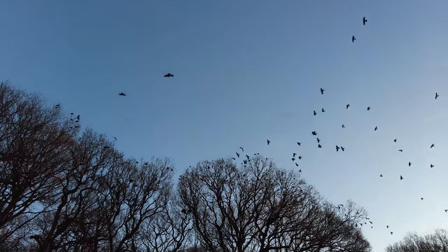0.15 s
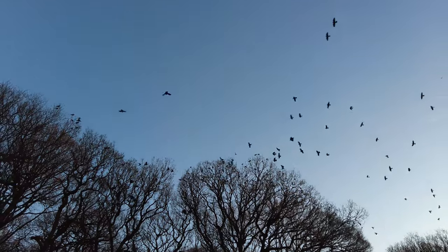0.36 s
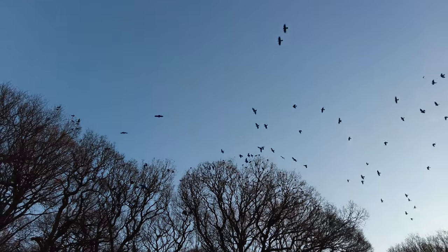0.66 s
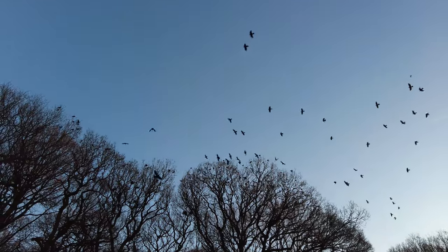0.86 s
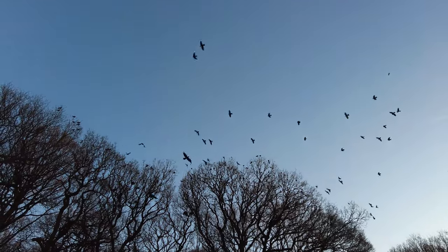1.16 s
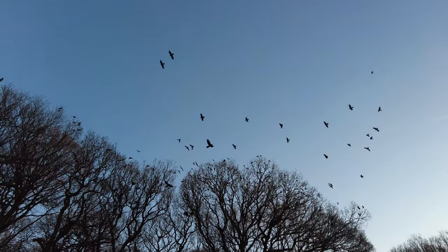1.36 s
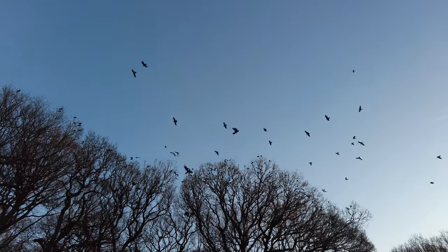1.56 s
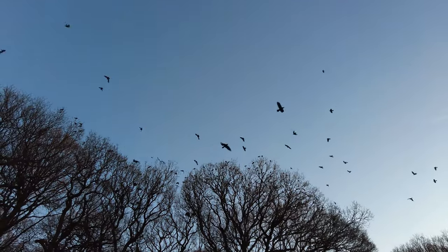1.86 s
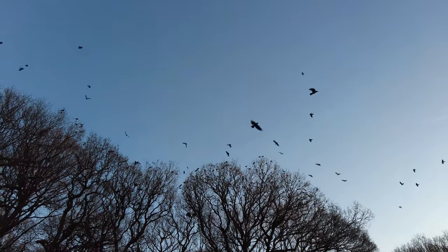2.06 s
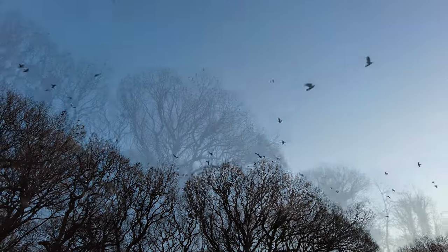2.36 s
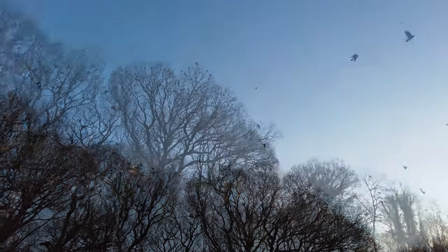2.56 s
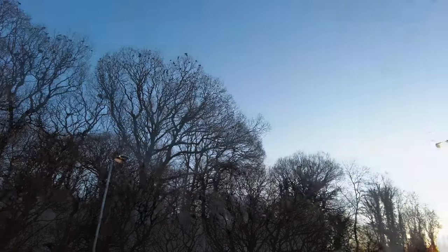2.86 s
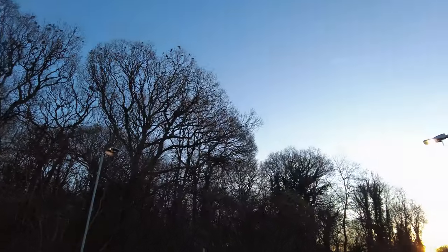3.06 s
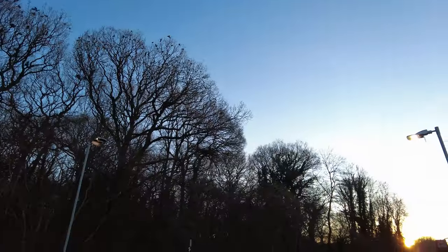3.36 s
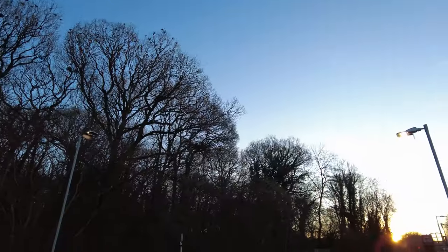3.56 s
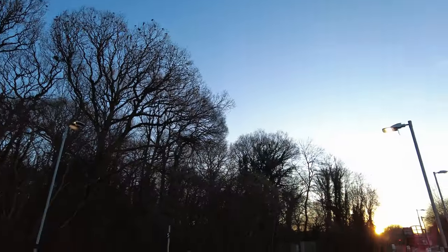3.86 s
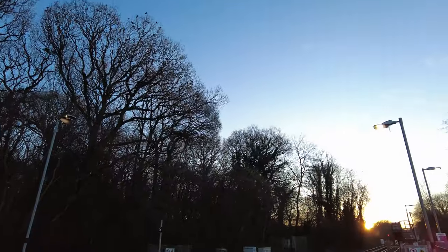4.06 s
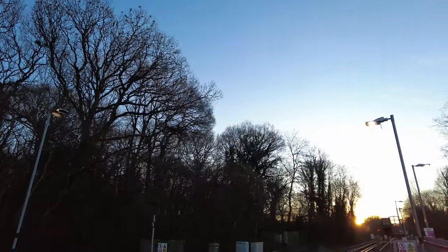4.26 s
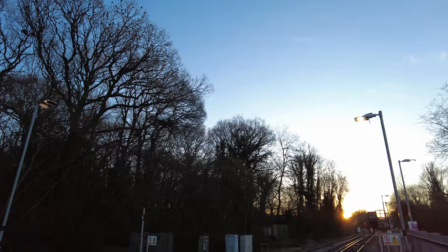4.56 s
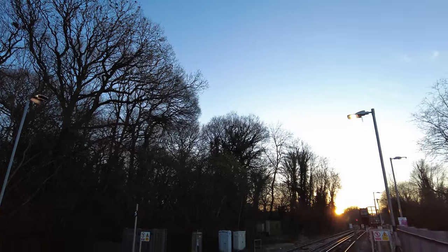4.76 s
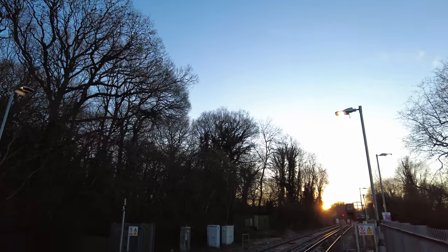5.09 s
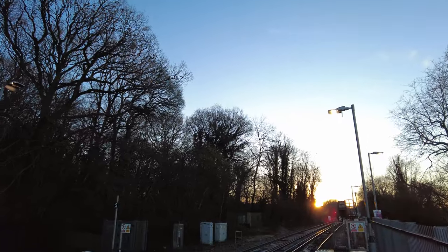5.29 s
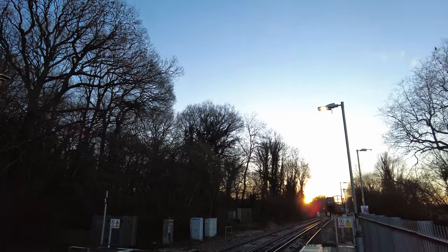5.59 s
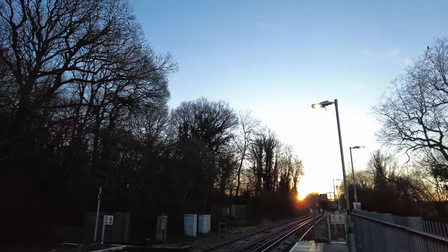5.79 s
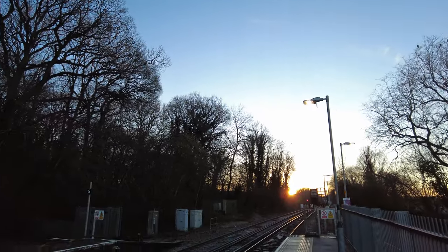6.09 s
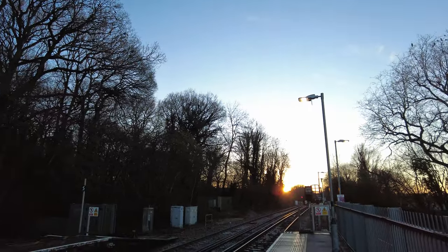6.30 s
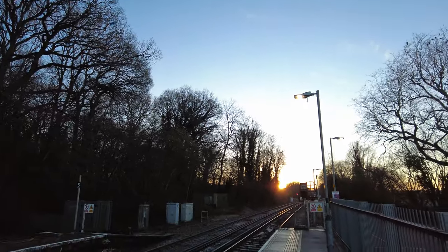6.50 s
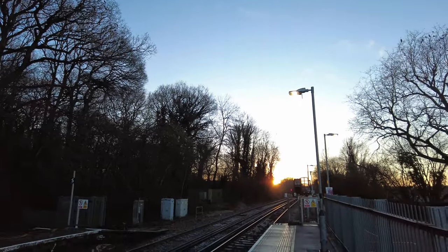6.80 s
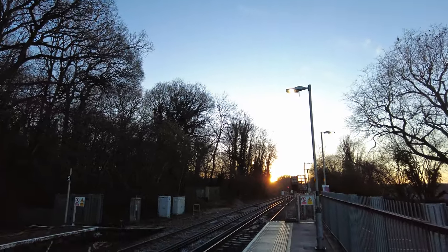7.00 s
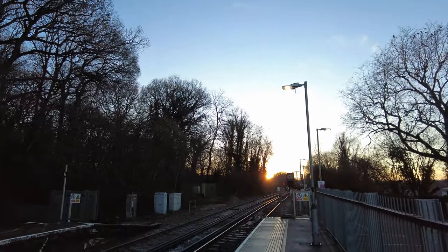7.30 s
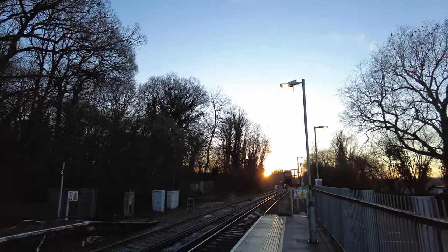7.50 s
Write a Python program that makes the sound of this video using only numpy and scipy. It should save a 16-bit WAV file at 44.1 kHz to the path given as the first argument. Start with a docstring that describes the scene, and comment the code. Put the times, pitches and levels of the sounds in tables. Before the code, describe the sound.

A jackdaw flock clamours over bare trees with short falling chacks, thins, then picks up again with two hoarse rook caws above low traffic rumble.

```python
"""Jackdaws flock over bare trees: each call is a short falling "chack" of harmonics seen through a throat.
Near calls stand out as clear glides with their own echoes; random farther calls make a clamour scattered
by the wood. A rook gives two long hoarse caws, pulses and breath ringing a wide throat.
Below lie far traffic (shaped noise), a low drone (resonated noise) and a mains hum (sine) that sets in partway."""
import sys
import numpy as np
from scipy import signal
from scipy.fft import rfft, irfft, next_fast_len
from scipy.io import wavfile
from scipy.ndimage import uniform_filter1d

SR = 44100
rng = np.random.default_rng(int(sys.argv[2]) if len(sys.argv) > 2 else 0)


def store_pcm(level_fs):
    """Save levels as 16-bit WAV."""
    pcm = np.round(np.clip(level_fs, -1, 1) * 32767).astype(np.int16)
    wavfile.write(sys.argv[1], SR, np.atleast_2d(pcm).T)


N = 336907

# Near jackdaw calls. Each row: time in seconds, length of the clear head in seconds, pitch at the head's start
# in Hz, at its end in Hz, level in dB, first partial against the second in dB, third against the second in dB,
# brightness of the partials above in dB, their rasp (0-1).
NEAR_CALLS = [(0.015, 0.061, 1262, 1200, -54, 7, -18, -14, 0.69),
              (0.117, 0.02, 1326, 1231, -36, 0.5, -15, 0, 0.1),
              (0.227, 0.026, 1400, 1135, -39, 0, -17, 8.5, 0.21),
              (0.299, 0.018, 1320, 1233, -42.5, 1, -22, 5, 0.1),
              (0.343, 0.035, 1351, 1237, -36, -4.5, -27, 3, 0.1),
              (0.394, 0.025, 1262, 1300, -40, -12, -30, 12.5, 0.4),
              (0.446, 0.024, 1270, 1075, -38.5, -13, -37, 3.5, 0.14),
              (0.571, 0.017, 1367, 1220, -38, -2, -37, 1, 0.1),
              (0.635, 0.014, 1246, 1167, -34.5, -2.5, -33, 3, 0.11),
              (0.751, 0.028, 1405, 1066, -38, 3.5, -25, 4.5, 0.18),
              (0.808, 0.025, 1518, 1283, -44.5, 1, -1.5, 10, 0.2),
              (0.829, 0.023, 1356, 1135, -35.5, 0.5, -33, -1, 0.18),
              (0.958, 0.025, 1470, 1320, -43.5, 4, -16, 11, 0.3),
              (0.979, 0.022, 1360, 1267, -35.5, -6, -29, -1.5, 0.46),
              (1.015, 0.035, 1373, 1202, -37.5, -21, -34, 2, 0.24),
              (1.117, 0.02, 1325, 1170, -40.5, 0, -28, 5.5, 0.35),
              (1.154, 0.03, 1337, 1118, -42, -11, -23, 1, 0.31),
              (1.192, 0.032, 1340, 1255, -39, -4, -28, 8, 0.1),
              (1.227, 0.031, 1299, 1260, -44, -2, -27, -4, 0.1),
              (1.274, 0.033, 1325, 1067, -54, -9, -9, 12, 0.22),
              (1.308, 0.043, 1360, 1158, -42, -5, -27, 4.5, 0.27),
              (1.371, 0.04, 1363, 1260, -42, -9, -21, 3.5, 0.18),
              (1.426, 0.028, 1298, 1224, -43.5, 5, -24, 10.5, 0.29),
              (1.641, 0.035, 1292, 1100, -46, 7, -14, 15.5, 0.1),
              (1.649, 0.028, 1240, 1063, -35.5, -2.5, -32, 6, 0.49),
              (1.753, 0.016, 1280, 1260, -42, 2, -21, 6, 0.47),
              (1.905, 0.037, 1324, 1330, -41.5, -17, -54, -5, 0.1),
              (1.92, 0.047, 1355, 1232, -39.5, -4.5, -27, 7.5, 0.1),
              (1.997, 0.024, 1374, 1314, -39.5, -16, -24, 6.5, 0.58),
              (2.106, 0.021, 1392, 1288, -37.5, -3.5, -23, 4, 0.63),
              (2.19, 0.044, 1422, 1272, -38.5, -4, -24, -0.5, 0.1),
              (2.307, 0.05, 1309, 1341, -39.5, -6.5, -30, 3.5, 0.1),
              (2.371, 0.019, 1330, 1140, -35.5, 4, -16, -1, 0.13),
              (2.558, 0.02, 1356, 1036, -38.5, 4, -26, 0, 0.27),
              (2.634, 0.023, 1363, 1254, -39, -3, -21, 8, 0.28),
              (2.822, 0.038, 1110, 930, -55, -6, -29, -15, 0.34),
              (2.873, 0.032, 1474, 1180, -40.5, 2.5, -16, 11, 0.24),
              (3.072, 0.044, 1101, 913, -55.5, 1, -16, -11, 0.54),
              (3.134, 0.056, 1228, 1031, -44, -10, -23, 3.5, 0.41),
              (3.176, 0.055, 881, 747, -49, -32, -6, 9, 0.67),
              (3.296, 0.021, 1414, 1400, -47.5, -1, -23, 3, 0.45),
              (3.312, 0.018, 865, 788, -48.5, -16, -4, -6, 0.63),
              (3.33, 0.024, 1080, 965, -47, -2, -13, 2, 0.65),
              (3.352, 0.03, 1093, 874, -57.5, 11.5, 1, -10, 0.6),
              (3.474, 0.03, 1155, 874, -50, -16, -18, -7, 0.2),
              (3.616, 0.019, 1050, 902, -50, -6, -34, -18, 0.29),
              (3.685, 0.027, 1305, 1094, -59, -10, -23, -14, 0.33),
              (3.733, 0.031, 972, 842, -54, -11, -15, -7, 0.84),
              (3.78, 0.039, 986, 735, -50, -21, -2, -6, 0.83),
              (3.83, 0.025, 905, 730, -59, -9, -9, -14.0, 0.7),
              (3.972, 0.029, 1165, 818, -45, -7, -14, -7, 0.62),
              (4.026, 0.06, 927, 780, -60, -8, -8, -2, 0.47),
              (4.056, 0.025, 1280, 1198, -39.5, -3, -30, 4, 0.1),
              (4.351, 0.029, 1578, 1293, -42, 1.5, -26, 8, 0.1),
              (4.507, 0.026, 1615, 1238, -38, -3, -19, 5.5, 0.26),
              (4.877, 0.027, 987, 831, -51, -9, -12, 0, 0.4),
              (5.055, 0.009, 996, 935, -51, -1, -23, -13, 0.7),
              (5.086, 0.031, 1100, 923, -43.5, -2, -10, -9, 0.1),
              (5.209, 0.01, 992, 941, -44.5, -6, -7, -6, 0.8),
              (5.269, 0.032, 1446, 1178, -42, 2, -7.5, -9, 0.1),
              (5.301, 0.044, 1041, 701, -40, -18, -16, -10, 0.53),
              (5.355, 0.027, 1348, 1208, -42, -0.5, -26, 6, 0.45),
              (5.365, 0.029, 1049, 937, -47, -9, -2, -9, 0.33),
              (5.425, 0.031, 1106, 927, -48, -5, -0.5, 6, 0.27),
              (5.605, 0.036, 1069, 1013, -45.5, -8, -18, -9, 0.22),
              (5.636, 0.024, 1213, 1164, -40.5, -5, -18, 8, 0.65),
              (5.642, 0.045, 1145, 800, -53, 5, -19, -9, 0.57),
              (5.751, 0.026, 1368, 1226, -39.5, 4, -15, 4, 0.22),
              (5.873, 0.027, 1440, 1330, -43.5, -6, -28, -7, 0.39),
              (5.989, 0.023, 1380, 1242, -38, 1, -30, 4, 0.1),
              (6.096, 0.019, 917, 742, -41, -23, -18, 7, 0.55),
              (6.191, 0.032, 1443, 1393, -40.5, 1.5, -18, 5, 0.25),
              (6.212, 0.036, 1386, 1237, -42.5, -14, -35, 7, 0.1),
              (6.323, 0.023, 1295, 952, -42.5, -11, -14.5, -2, 0.15),
              (6.458, 0.05, 1378, 1295, -45.5, -16, -30, 6.5, 0.25),
              (6.515, 0.045, 1037, 832, -48.5, -10, -8, 0, 0.68),
              (6.632, 0.019, 977, 832, -54.5, -5, -9, -6, 0.53),
              (6.71, 0.024, 1390, 1310, -47, -2, -27, 1, 0.34),
              (6.762, 0.019, 1362, 1326, -47, -3, -39, -2, 0.12),
              (6.792, 0.027, 1190, 1136, -47.5, -4, -31, -1, 0.64),
              (6.819, 0.018, 1500, 1317, -46, 1, -31, -8, 0.61),
              (6.935, 0.02, 1525, 1314, -45, 0, -31, 6, 0.39),
              (6.951, 0.013, 1058, 927, -46, -9, -14, -10, 0.39),
              (7.019, 0.03, 1280, 1101, -41.5, -7, -36, 5, 0.1),
              (7.09, 0.016, 1006, 940, -50.5, -4, -10, -17, 0.46),
              (7.218, 0.024, 1495, 1130, -46.5, 4, -19, -2, 0.45),
              (7.239, 0.03, 1465, 1170, -41.5, 3.5, -17, 2, 0.1),
              (7.275, 0.051, 1064, 836, -44.5, -7.5, -14, -1, 0.4),
              (7.325, 0.042, 947, 678, -40.5, -37, -14, -13, 0.7),
              (7.346, 0.023, 1400, 1272, -35, -2, -33, 4.5, 0.093),
              (7.387, 0.035, 1323, 1090, -38.5, -5, -20, 4, 0.45),
              (7.525, 0.025, 1450, 1166, -45, -12, -26, 5, 0.48),
              (7.621, 0.012, 1370, 1323, -39.5, -0.5, -11, 5, 0.088)]
# Slowly changing clamour of the other birds, with near-silent gaps. Each row: time in seconds, level in dB,
# brightness in dB.
CLAMOUR_CURVE = [(0.0, -37, 0), (0.55, -46, 0), (0.93, -40.5, -0.5), (1.02, -45, 3), (1.45, -34.5, -1),
                 (1.62, -46, -3), (2.06, -39.5, -0.5), (2.28, -41, 1), (2.5, -40, 0), (2.66, -40.5, -1),
                 (2.68, -52.5, 2.5), (3.3, -66, 2), (3.6, -82, 7), (4.2, -45, 4), (4.9, -72, 5.5),
                 (5.3, -47, 8.5), (5.47, -41.5, 1), (5.51, -72, 0), (5.6, -49, 1.5), (5.9, -42.5, 7),
                 (6.3, -44, 1.5), (6.6, -53, -4), (6.75, -45.5, 5), (7.1, -48.5, 0.5), (7.2, -53, 1),
                 (7.42, -39.5, 2.5), (7.64, -41.5, 4.5)]
# Rook caws. Each row: start in seconds, length in seconds, time to full strength in seconds,
# pulse rate at the start in Hz, at the end in Hz, level in dB.
ROOK_CAWS = [(3.982, .71, 0.4, 212.8, 171.9, -47), (5.741, .55, 0.017, 185.6, 176.7, -47)]
# Jackdaw throat response. Each row: frequency in Hz, gain in dB.
JACKDAW_THROAT_RESPONSE = [(600, -5), (950, -16.5), (1250, -4.5), (1500, 8), (2000, -3), (2600, 0),
                           (3100, 0), (3500, -27.5), (4800, -7), (6000, -6), (7100, -20), (9100, -20),
                           (15000, -45)]
# Rook throat resonances. Each row: frequency in Hz, width of the first of two resonators in Hz, gain in dB.
ROOK_RESONANCES = [(1280, 107, 1.5), (1435, 680, -4.5), (1970, 160, -3), (2750, 170, -13), (3390, 110, -18),
                   (4830, 930, -34)]
# Traffic spectrum. Each row: frequency in Hz, relative density in dB per Hz.
TRAFFIC_SPECTRUM = [(12, -35), (20, 6), (59, -3), (196, -10), (686, -13), (1130, -10), (1270, -14),
                    (1820, -33), (2760, -29), (3540, -41), (6360, -43), (12100, -49), (15500, -54)]
# Traffic correlation of the channels before the lag. Each row: frequency in Hz, left-right likeness (0-1).
TRAFFIC_LIKENESS = [(30, 1), (125, 0.88), (300, 1), (600, 0.48), (1000, 0.87), (2000, 0.2), (5000, 0.21),
                    (12000, 0.21)]
# Mains hum. Each row: time in seconds, level in dB.
HUM_CURVE = [(2.6, -62), (3.5, -58.5), (7.64, -54)]

# Jackdaw call: after its head it slides on down and turns hoarse
TAIL_S, TAIL_FALL = 0.04, 0.78   # near calls end at this share of the head's end pitch
PITCH_BEND = 1.25   # above 1 the pitch lingers at the top before it falls
UPPER_DB = -8.5   # partials above the third, at the syrinx
SECOND_FOLLOWS = 0.58   # share of the throat's colour that the second partial takes on as it falls

# At SHIFT_S the near sound drops for DIP_S; from then on the birds sit farther left and sound duller
SHIFT_S, DIP_S, DIP_DB = 2.663, 0.14, -14
LAG_BEFORE_SAMPLES, LAG_AFTER_SAMPLES = 1, -3   # left channel against right
DULL_HZ = 10500

# Each near call leaves a short diffuse echo, made from the clamour's noise
DIFFUSE_DB, DIFFUSE_RISE_S, DIFFUSE_T60_S = 4, 0.034, 0.46   # dB relative to the call
DIFFUSE_BRIGHT_SHARE = 0.35   # of the call's brightness

CAW_ONSET_SHARE, CAW_RELEASE_S = 0.46, 0.11   # strength reached in the first 20 ms, before the swell

WOOD_T60_S, CLUSTER_T60_S = 0.49, 0.019
NEAR_WOOD_DB, FAR_WOOD_DB, ROOK_WOOD_DB = -8.5, -3, -1.5
TRUNK_MIN_S, TRUNK_MAX_S, TRUNK_DB = 0.014, 0.028, -13   # two near trunks throw back distinct echoes

# The road lies to the right: the left channel hears it late, half a cycle at OPPOSED_HZ
TRAFFIC_DB, OPPOSED_HZ, LAG_GROWTH = -47, 828, 0.98
DRONE_HZ, DRONE_WIDTH_HZ, DRONE_DB = 48, 19.4, -48.5
HUM_HZ, HUM_START_S, HUM_FADE_S = 148.7, 2.5, 0.68
BASS_CUT_HZ, CUTOFF_HZ = 16, 15700


def near_jackdaws():
    """Calls that stand out of the clamour; each of four places has its own echo."""
    places = np.zeros((4, 2, N))
    for row, place in zip(NEAR_CALLS, rng.random(200)):
        s, head_s, start_hz, mid_hz, level_db, *colour = row
        call = chack(head_s, start_hz, mid_hz, TAIL_FALL * mid_hz, *colour, rough=0.14, tail_db=-13)
        add(places, from_db(level_db) * call, s - 0.003, place)
    return near_dip() * sum(wood(track, NEAR_WOOD_DB) for track in places)


def chack(head_s, start_hz, mid_hz, end_hz, first_db, third_db, bright_db, rasp, rough, tail_db):
    """Harmonics of a falling pitch through the throat; the second partial has rms about 1 in the head."""
    t = np.arange(int((head_s + TAIL_S) * SR)) / SR
    early = np.minimum(t / head_s, 1)
    late = np.clip((t - head_s) / TAIL_S, 0, 1)
    head_pitch = start_hz * (mid_hz / start_hz) ** early ** PITCH_BEND
    pitch = head_pitch * (end_hz / mid_hz) ** late
    hoarse = rough + 1.2 * late
    order = np.arange(1, 13)[:, None]
    mean_hz = (start_hz + mid_hz) / 2

    throat_db = at_hz(JACKDAW_THROAT_RESPONSE, order * pitch)
    level_db = throat_db - at_hz(JACKDAW_THROAT_RESPONSE, 2 * mean_hz)
    favour_db = 3 * rng.standard_normal((9, 1))   # every call favours other overtones
    soft_attack_db = -7 * np.exp(-t / 0.016)   # upper partials swell after the attack
    level_db[3:] += UPPER_DB + bright_db + favour_db + soft_attack_db
    level_db[1] *= SECOND_FOLLOWS
    level_db[0] = first_db + throat_db[0] - at_hz(JACKDAW_THROAT_RESPONSE, start_hz)
    third_colour_db = throat_db[2] - at_hz(JACKDAW_THROAT_RESPONSE, 3 * mean_hz)
    level_db[2] = third_db + 0.5 * third_colour_db + 5 - 8 * early   # boosted at the onset

    uneven_pitch = pitch * (1 + 0.1 * hoarse * wobble(len(t), 400))
    phase = 2 * np.pi * np.cumsum(uneven_pitch) / SR
    # timing slips break up the upper partials
    loose = (order > 2) * (0.06 + late)
    rasp_slip = np.clip(rasp - 0.1, 0, 1) * (0.4 + 0.6 * early) + 0.08 * early
    loose = loose + (order > 3) * rasp_slip
    partials = from_db(level_db) * np.sin(order * (phase + loose * wobble(len(t), 1200)))

    voice = np.sqrt(2) * partials.sum(axis=0) * (1 + 0.5 * hoarse * wobble(len(t), 1500))
    attack = np.minimum(t / 0.009, 1)
    release = from_db(tail_db * np.sqrt(late)) * np.minimum((1 - late) / 0.049, 1)
    return voice * attack * release


def add(tracks, call, s, place):
    """Lay a call into the track of its place (0-1); place and time set the lag between the channels."""
    track = tracks[int(place * len(tracks))]
    base_lag = LAG_BEFORE_SAMPLES if s < SHIFT_S else LAG_AFTER_SAMPLES
    lag = base_lag + round(3 * place - 1.5)
    right_start = round(s * SR)
    for side, start in enumerate((right_start + lag, right_start)):
        heard = call[max(-start, 0):N - start]   # a call may be under way at the start
        first = max(start, 0)
        track[side, first:first + len(heard)] += heard


def near_dip():
    """Gain of the near sound: a short dip at the shift."""
    since = np.arange(N) / SR - SHIFT_S
    return from_db(DIP_DB * (since > 0) * (since < DIP_S))


def flock(count):
    """Farther birds call at random; the clamour swells and sinks along its level curve and carries diffuse echoes."""
    level_db, bright_db = in_time(CLAMOUR_CURVE)
    places = np.zeros((4, 2, N))
    for s, length, high, fall, size, place, low in rng.random((count, 7)):
        start_hz = 1000 + 450 * high
        mid_hz = start_hz * (0.95 - 0.2 * fall)
        first_db = at_hz(JACKDAW_THROAT_RESPONSE, start_hz) - 2 - 5 * low
        call = chack(0.02 + 0.025 * length, start_hz, mid_hz, 0.75 * mid_hz, first_db, third_db=-16,
                     bright_db=0, rasp=0.3, rough=0.22, tail_db=-5)
        add(places, from_db(7.8 * size) * call, s * N / SR - 0.04, place)
    out = sum(wood(track, FAR_WOOD_DB) for track in places)
    # the clamour is already under way: a stretch from the middle fades out under the opening
    lead = SR // 10
    out[:, :lead] += out[:, N // 2:N // 2 + lead] * np.linspace(1, 0, lead)
    power = uniform_filter1d(np.mean(out ** 2, axis=0), size=SR // 8)
    out /= np.sqrt(power + 1e-9)   # even out before the level curve
    high_pass = signal.butter(3, 3200, "high", fs=SR, output="sos")
    treble = signal.sosfilt(high_pass, out)   # set apart so that its brightness can vary
    body_gain, treble_gain = np.sqrt(from_db(2 * level_db) + diffuse_echo_power())
    return body_gain * (out - treble) + treble_gain * from_db(bright_db) * treble


def diffuse_echo_power():
    """Power envelopes (body, treble) of the near calls' diffuse echo: quick rise, exponential fall."""
    kicks = np.zeros((2, N))
    for s, _, _, _, level_db, _, _, bright_db, _ in NEAR_CALLS:
        tilt_db = np.array([0, DIFFUSE_BRIGHT_SHARE * bright_db])
        kicks[:, int(s * SR)] += from_db(2 * (level_db + DIFFUSE_DB + tilt_db))   # doubled dB: power
    t = np.arange(SR // 2) / SR
    shape = np.minimum(t / DIFFUSE_RISE_S, 1) ** 2 * from_db(-120 * t / DIFFUSE_T60_S)
    power = signal.oaconvolve(kicks, shape[None], axes=1)[:, :N]
    return np.maximum(power, 0) * near_dip() ** 2


def rook():
    """Strong-weak pulses with breath noise on each ring a wide throat."""
    out = np.zeros(N)
    for s, length_s, swell_s, start_hz, end_hz, level_db in ROOK_CAWS:
        since = np.arange(N) / SR - s
        ending = np.clip(1 - (length_s - since) / CAW_RELEASE_S, 0, 1)
        rate_hz = np.interp(since, [0, length_s], [start_hz, end_hz])
        cycles = np.cumsum(rate_hz * (1 + 0.025 * wobble(N, 90))) / SR
        whole = np.floor(cycles)
        pulses = np.diff(whole, prepend=0) * (1 + 0.68 * (-1) ** whole)
        breath = 0.02 * rng.standard_normal(N) * np.exp(-3.0 * (cycles % 1))
        throat = np.zeros(N)
        for k, (hz, width_hz, db) in enumerate(ROOK_RESONANCES):
            ringing = resonance(resonance(pulses + breath, hz, width_hz), hz, 2 * width_hz)
            throat += (-1) ** k * from_db(db) * ringing   # alternating polarity
        swell = np.interp(since, [0, 0.02, swell_s], [0, CAW_ONSET_SHARE, 1])
        out += from_db(level_db) * swell * (1 - ending) * rms_one(throat)
    return wood(np.array([out, out]), ROOK_WOOD_DB)


def wood(x, wet_db):
    """Trunks and branches scatter sound: a dense early cluster, then a duller decay, partly its own at each ear."""
    t = np.arange(SR // 2) / SR
    onset = np.clip((t - 0.006) / 0.0062, 0, 1)   # the first branches are some metres away
    noise = rng.standard_normal((3, len(t))) * onset
    late = signal.lfilter([0.35], [1, -0.65], noise) * from_db(-60 * t / WOOD_T60_S)
    echo = late + 2.6 * noise * from_db(-60 * t / CLUSTER_T60_S)
    echo = 0.83 * echo[0] + 0.93 * echo[1:]   # shared part plus each ear's own
    echo /= np.sqrt(np.sum(echo ** 2) / 2)
    echo *= from_db(wet_db)
    trunk_s = rng.uniform(TRUNK_MIN_S, TRUNK_MAX_S, size=2)
    echo[:, (trunk_s * SR).astype(int)] += from_db(TRUNK_DB)
    return x + signal.oaconvolve(x, echo, axes=1)[:, :N]


def traffic():
    """Steady far noise shaped in frequency; a common and an opposed part set the channels' likeness."""
    size = next_fast_len(N)
    hz = np.arange(size // 2 + 1) * SR / size
    mid, side = rfft(rng.standard_normal((2, size)))
    alike = np.clip(at_hz(TRAFFIC_LIKENESS, hz), 0, 1)
    both = np.sqrt(1 + alike) * mid + np.sqrt(1 - alike) * side * [[1], [-1]]
    both[0] *= np.exp(-1j * np.pi * (hz / OPPOSED_HZ) ** LAG_GROWTH)   # left lags
    noise = irfft(both * from_db(at_hz(TRAFFIC_SPECTRUM, hz)), size)[:, :N]
    return from_db(TRAFFIC_DB) * rms_one(noise)


def hum():
    """A sine near the third multiple of the mains pitch, its level wavering slightly."""
    t = np.arange(N) / SR
    level_db, = in_time(HUM_CURVE)
    fade_in = np.clip((t - HUM_START_S) / HUM_FADE_S, 0, 1)
    gain = from_db(level_db + 0.36 * wobble(N, 1.82))
    return np.sqrt(2) * gain * fade_in * np.sin(2 * np.pi * HUM_HZ * t)


def drone():
    """Noise through two resonators near the mains pitch wavers as a low drone."""
    noise = rng.standard_normal(N)
    ringing = resonance(resonance(noise, DRONE_HZ, DRONE_WIDTH_HZ), DRONE_HZ, 2 * DRONE_WIDTH_HZ)
    return from_db(DRONE_DB) * rms_one(ringing)


def resonance(x, hz, width_hz):
    """Two-pole resonator, gain about 1 at its peak."""
    r = np.exp(-np.pi * width_hz / SR)
    zeros = [(1 - r * r) / 2, 0, (r * r - 1) / 2]
    poles = [1, -2 * r * np.cos(2 * np.pi * hz / SR), r * r]
    return signal.lfilter(zeros, poles, x)


def wobble(size, rate_hz):
    """Normal random values at rate_hz, joined by straight lines."""
    count = int(N * rate_hz / SR) + 2 if size == N else 400
    knots = rng.standard_normal(count)
    return np.interp(np.arange(size) * rate_hz / SR, np.arange(count), knots)


def in_time(rows):
    """Columns of a curve table at every sample."""
    s, *columns = np.transpose(rows)
    return [np.interp(np.arange(N) / SR, s, column) for column in columns]


def at_hz(points, hz):
    """Read a spectrum table on a log-frequency axis."""
    table_hz, values = np.transpose(points)
    return np.interp(np.log(hz + 1), np.log(table_hz), values)


def from_db(db):
    """Decibels to gain."""
    return 10 ** (np.asarray(db) / 20)


def rms_one(x):
    """Scale to unit rms."""
    return x / np.sqrt(np.mean(x ** 2) + 1e-20)


def scene():
    """Birds over the low background; after the shift the birds sound duller."""
    birds = near_jackdaws() + flock(count=300) + rook()
    dulled = signal.lfilter(*signal.butter(1, DULL_HZ, fs=SR), birds)
    before_shift = np.arange(N) < SHIFT_S * SR
    return np.where(before_shift, birds, dulled) + traffic() + hum() + drone()


def record(dry):
    """The left channel loses a little deep bass; both lose the top."""
    left = signal.lfilter(*signal.butter(1, BASS_CUT_HZ, "high", fs=SR), dry[0])
    low_pass = signal.ellip(12, 0.5, 70, CUTOFF_HZ, fs=SR, output="sos")
    return signal.sosfilt(low_pass, np.array([left, dry[1]]))


dry = scene()
out = record(dry)
store_pcm(out)
```